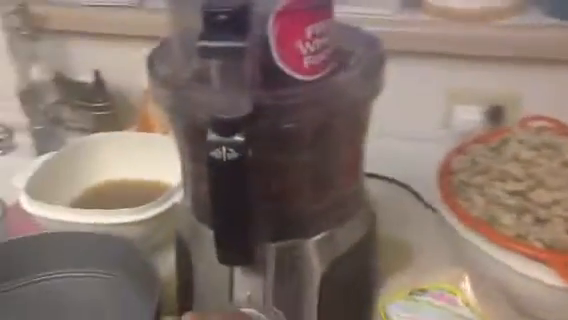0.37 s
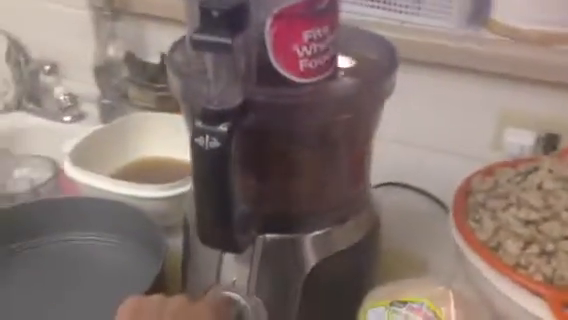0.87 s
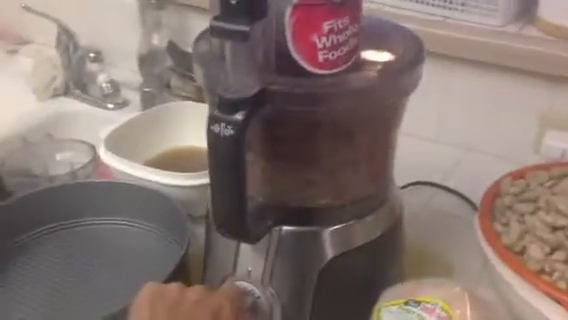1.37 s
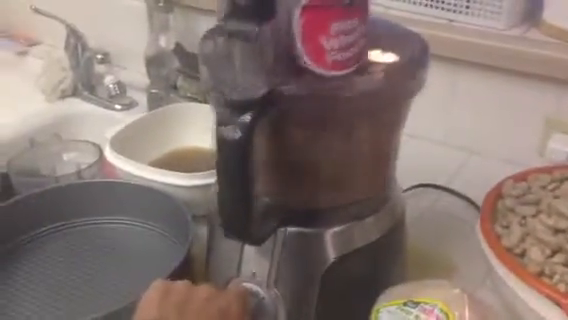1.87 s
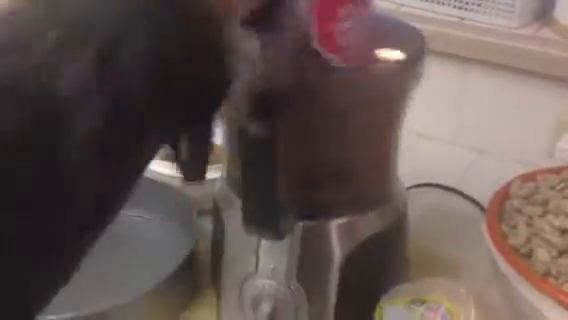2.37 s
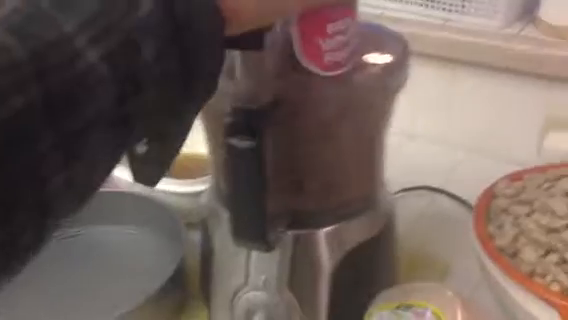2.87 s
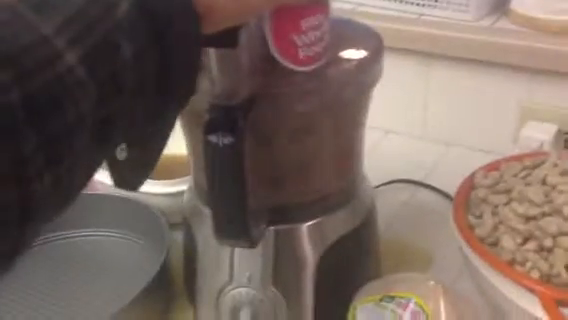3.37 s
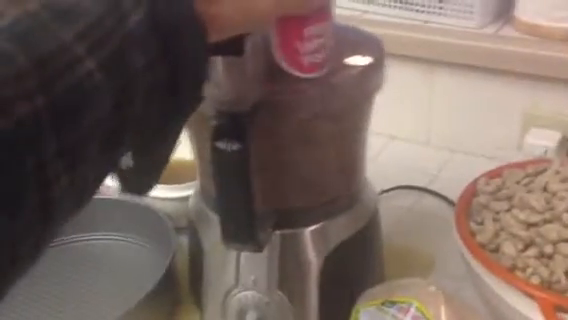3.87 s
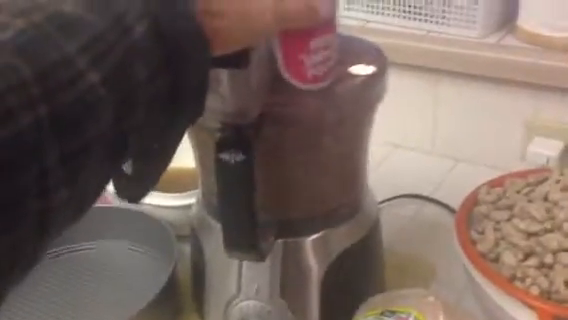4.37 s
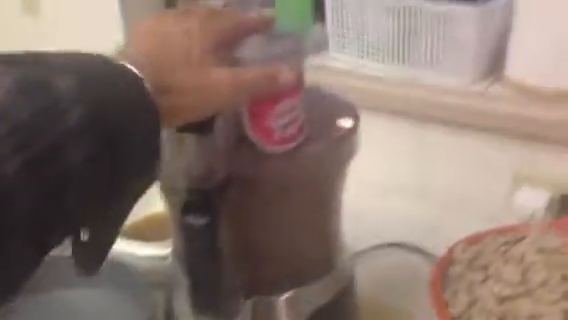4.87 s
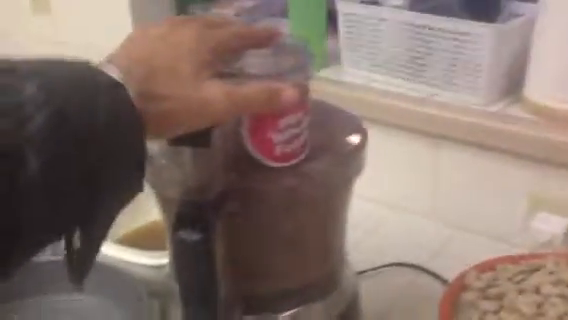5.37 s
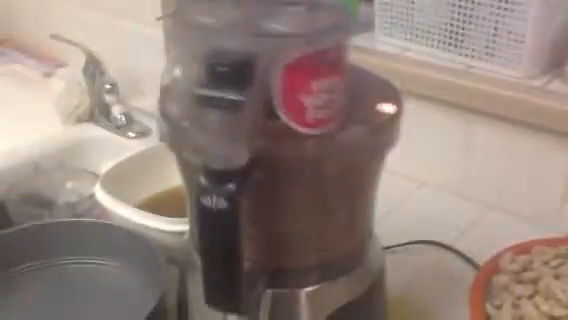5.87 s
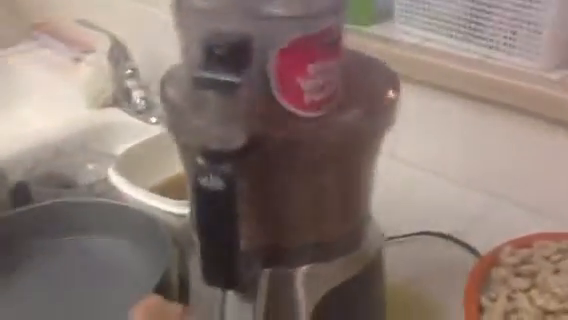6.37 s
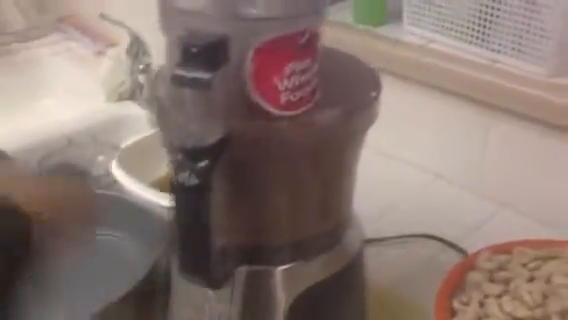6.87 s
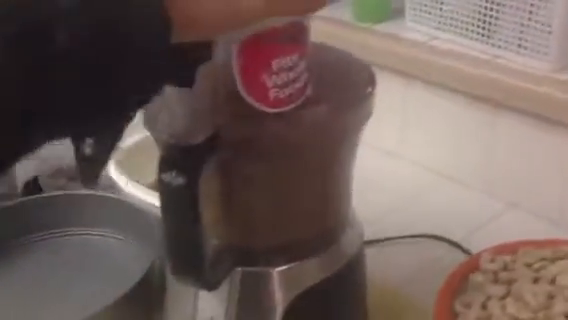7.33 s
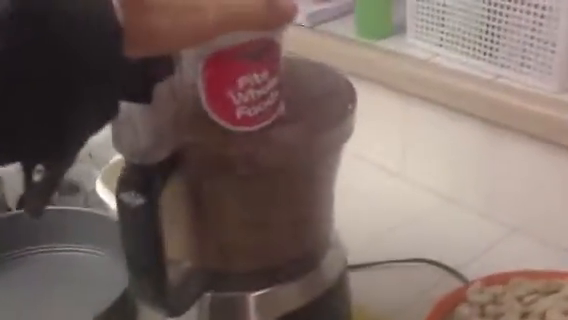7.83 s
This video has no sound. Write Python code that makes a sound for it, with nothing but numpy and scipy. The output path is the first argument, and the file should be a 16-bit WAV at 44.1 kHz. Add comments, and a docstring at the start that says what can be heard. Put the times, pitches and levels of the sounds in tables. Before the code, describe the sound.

A food processor clicks on close by, its gear whine racing up, bogging down under hard nuts with sharp knocks, then rising brighter at the end.

```python
"""Food processor grinding nuts

A food processor on a kitchen counter is switched on and grinds nuts, close to a phone.
Gear teeth whine through the ringing housing and sag under load; filtered noise makes the churning food,
the booming bowl and the fizz, and short noise bursts make hard pieces knock on the wall.
Touches on the knob come before the start; a faint hum and room tone lie under everything."""
import sys
import numpy as np
from scipy import signal
from scipy.fft import rfft, irfft, next_fast_len
from scipy.io import wavfile

SR = 44100
rng = np.random.default_rng(int(sys.argv[2]) if len(sys.argv) > 2 else 0)


def digitize_waveform(pressure):
    """Quantize a signal to 16-bit integers and store it at the path in sys.argv[1].

    Rows of a 2-D input are taken as channels; values are limited to [-1, 1].
    """
    field = np.atleast_2d(pressure).T
    bounded = np.clip(field, -1, 1)
    quanta = np.round(bounded * 32767).astype(np.int16)
    wavfile.write(sys.argv[1], SR, quanta)


def volts(x):
    """Linear amplitude factor 10**(x/20) for a level x in dB, scalar or array-like."""
    e = np.asarray(x, float) / 20
    return 10 ** e


N = 351477  # length in samples
T = np.arange(N) / SR  # time in seconds
START_S = .675  # the machine comes on

# Multiples of the tooth rate heard in the whine; the fractions are shaft sidebands: multiple
TOOTH_MULTIPLES = [.85, 1, 1.15, 1.85, 2, 3, 4, 5]
# How strong and how blurred each of those multiples is: level_db, smear_hz
TOOTH_SMEAR = [(-6, 142), (0, 96), (-9.5, 89), (-13.5, 125), (0, 129), (-6, 148), (-7.5, 88), (-8.5, 170)]
# Broad colour of the whine: pitch_hz, level_db
SHELL_COLOUR = [(700, -3.5), (1000, 2), (1300, 0.5), (1600, -2), (2100, 1.5), (2450, -1), (2900, -0.5),
                (3400, -3), (3900, 1.5), (4400, -1), (5000, -7.5), (6500, -25)]
STEADY = .3  # share of pure tone in each multiple
FLICKER_DB, FLICKER_HZ = 1.8, 9.  # each multiple swells and fades by itself


def whine():
    """Tooth impacts; no two are alike, so each multiple is a wandering cluster round a weak steady core."""
    rate = control(column=1)
    shell_hz, shell_db = np.transpose(SHELL_COLOUR)
    phase = 2 * np.pi * np.cumsum(rate * (1 + 0.01598 * wander(35.12))) / SR
    teeth = np.zeros(N)
    for k, (db, smear_hz) in zip(TOOTH_MULTIPLES, TOOTH_SMEAR):
        colour_db = np.interp(np.log(k * rate), np.log(shell_hz), shell_db)
        level = volts(db + colour_db + FLICKER_DB * wander(FLICKER_HZ))
        core = (STEADY + wander(smear_hz)) * np.cos(k * phase)
        blur = wander(smear_hz) * np.sin(k * phase)
        teeth += level * (core + blur)
    loaded = teeth * blade(1.0, 0.11, 1.97, 27.0)
    return volts(control(column=2)) * housing(loaded, direct=0.67)


# The motor spins up, sags as the blade bites, and speeds up again:
# time_s, tooth_rate_hz (before small chance wobbles), whine_db (gain), food_noise_db
MOTOR_COURSE = [(0.68, 600, -41, -32), (0.76, 793.9, -31, -23.5), (0.84, 1101, -26, -24.5),
                (0.91, 1220, -27.5, -23.5), (0.99, 1328, -24.5, -22.5), (1.229, 1450, -24, -21.5),
                (1.45, 1479, -25.5, -22), (1.6, 1364, -25.5, -21), (1.86, 1251, -26.5, -24.5),
                (1.93, 1085, -24, -22), (2.03, 990, -27, -23.5), (2.19, 935, -29, -24.5),
                (2.56, 997, -31, -24.5), (2.75, 905.7, -31, -26.5), (2.99, 1094, -32.5, -27.5),
                (3.15, 1111, -28.5, -26.5), (3.321, 1052, -31, -28.5), (3.471, 1097, -30.5, -27),
                (3.7, 990, -29, -27.5), (3.83, 895, -29.5, -28), (4.1, 1066, -31, -29),
                (4.36, 969, -30.5, -27.5), (4.502, 891, -34, -28.5), (4.75, 1000, -29, -27.5),
                (4.97, 963.5, -33, -29.5), (5.13, 1048, -30.5, -29), (5.24, 997, -30.5, -29.5),
                (5.73, 1062, -30, -26), (6.1, 908, -33.5, -25), (6.4, 991.5, -33.5, -26),
                (6.71, 1131, -27.5, -28), (6.8, 1376, -29, -25), (6.93, 1560, -27, -23.5),
                (7.17, 1593, -27, -23), (7.33, 1550, -27.5, -24.5), (7.58, 1712, -25.5, -24),
                (7.97, 1658, -26, -23)]


def control(column):
    """One column of the motor table, drawn as straight lines between its moments."""
    rows = np.array(MOTOR_COURSE)
    return np.interp(T, rows[:, 0], rows[:, column])


def blade(sweep_db, ripple_db, lump_db, lump_hz):
    """Load on the blade: once a turn, with the mains ripple, and by lumps of food."""
    turns_per_s = control(column=1) / 80 * (1 + 0.037 * wander(5.5))
    turns = np.cumsum(turns_per_s) / SR
    sweep = sweep_db * np.cos(2 * np.pi * turns)
    ripple = ripple_db * np.cos(2 * np.pi * 60 * T)
    return evened(volts(sweep + ripple + lump_db * wander(lump_hz)))


# Narrow resonances of housing and bowl: pitch_hz, width_hz, level_db (over the broad colour)
HOUSING_RINGS = [(784, 45, 0.5), (994, 105, -7), (1168, 8.2, 3), (1425, 71, 0), (1637, 17, 2.5),
                 (1954, 34, 2.5), (2187, 49, -4.5), (2804, 29, 1.5), (2960, 137, 1), (3220, 81, -7.5),
                 (3710, 227, 0.5), (4790, 62, 2.5)]


def housing(x, direct):
    """A share of direct sound plus each resonance of the shell."""
    return direct * x + sum(volts(db) * ring(x, hz, width) for hz, width, db in HOUSING_RINGS)


# Colour of the food noise before it passes the shell: pitch_hz, level_db (noise per Hz)
CHURN_COLOUR = [(210, -71), (350, -8), (627, -9.5), (996, -4), (1290, -3.5), (1780, -3.5), (1990, -3),
                (2550, -4), (3910, -12), (6000, -21.5), (7800, -48), (13200, -120)]


def churn():
    """Crumbs dragged round the bowl, heard through the shell."""
    crumbs = coloured(grit(400, 3.3, 0.0052), CHURN_COLOUR)
    through_shell = housing(crumbs, direct=1.0)
    return volts(control(column=3)) * evened(through_shell * blade(0.59, 0.37, 1.0, 15.0))


def grit(per_s, spread_db, decay_s):
    """Noise made of short bursts of uneven size over a steady bed."""
    starts = rng.random(N) < per_s / SR
    sizes = volts(spread_db * np.minimum(rng.exponential(1, N), 5)) * starts
    bursts = signal.lfilter([1], [1, -np.exp(-1 / (decay_s * SR))], sizes)
    return rng.standard_normal(N) * (1.9 + bursts / bursts.mean())


# Colour of the boom: pitch_hz, level_db (noise per Hz)
BOOM_COLOUR = [(65, -69), (110, -37), (161, -13.5), (197, -2.5), (254, 0), (328, -3), (409, -11),
               (475, -17), (520, -9.5), (680, -20.5), (1140, -120)]
BOOM_DB, BOOM_DB_PER_OCTAVE, BOOM_FOLLOWS = -33.5, 1, 1.48  # FOLLOWS: dB per dB of food noise


def boom():
    """The bowl and counter shake at their lowest resonances."""
    level_db = law(BOOM_DB, BOOM_DB_PER_OCTAVE, BOOM_FOLLOWS) + 2 * wander(3.8)
    shaking = coloured(rng.standard_normal(N), BOOM_COLOUR) * blade(0.3, 0.32, 1.14, 25.0)
    return volts(level_db) * evened(shaking)


LOADED_HZ, USUAL_FOOD_DB = 1000, -27  # tooth rate and food noise at which the law adds nothing


def law(db, db_per_octave, follows):
    """Level in dB that rises with speed and with the noise of the food."""
    from_speed = db_per_octave * np.log2(control(column=1) / LOADED_HZ)
    from_food = follows * (control(column=3) - USUAL_FOOD_DB)
    return db + from_speed + from_food


# Colour of the fizz before the speed changes its top: pitch_hz, level_db (noise per Hz)
FIZZ_COLOUR = [(2350, -26), (4000, -4.5), (5450, -14.5), (6590, -15), (7210, -18.5), (13300, -32),
               (15300, -37)]
FIZZ_DB, FIZZ_DB_PER_OCTAVE, FIZZ_FOLLOWS = -37, 8, 0.84  # FOLLOWS: dB per dB of food noise


def fizz():
    """Fine particles spraying on plastic, and cooling air; brighter as the motor runs faster."""
    spray = coloured(grit(400, 1.1, 0.006), FIZZ_COLOUR)
    air = signal.sosfilt(signal.butter(2, 10000., "high", fs=SR, output="sos"), spray)
    spray = spray + 0.26 * (control(column=1) / 1200 - 1) * air
    level = volts(law(FIZZ_DB, FIZZ_DB_PER_OCTAVE, FIZZ_FOLLOWS))
    return level * evened(spray * blade(0.16, 0.38, 0.99, 5.2))


# The hardest pieces hitting the bowl: time_s, crack_db, thud_db (relative to the crack);
# both levels are nominal, with fixed trims and colours added below
HARD_KNOCKS = [(0.678, -45, 10), (1.5423, -23, -1), (1.612, -35, 12), (1.6906, -36, 3), (1.7947, -28, -2),
               (2.0002, -31, 5), (2.1686, -31, 0), (2.3208, -30, 3.5), (2.5284, -31, -13), (2.829, -34, -9),
               (3.4937, -40, -6), (3.6351, -38, 4), (4.0617, -42, 8.5), (4.2833, -34, -2), (4.363, -34, -2),
               (4.4193, -32.5, 0), (4.4441, -33, -4), (4.6312, -34, -10), (4.8812, -31.5, 1),
               (5.4138, -34, 0), (5.9643, -37, -6), (6.2841, -33, -6), (6.4881, -38, 6), (6.5495, -45, 11),
               (7.2551, -24, -15)]
SMALL_COUNT, SMALL_DB, SMALL_SPREAD_DB = 30, -36, 9  # smaller pieces: number, loudest, range below
TICK_DB, TICK_T60_S = 4, .008  # first contact of a knock: nominal level over its crack, decay by 60 dB


def knocks():
    """A sharp tick, a bright crack, and a duller thud through the shell."""
    cracks, thuds, ticks = np.zeros((3, N + 3000))
    t = np.arange(3000) / SR
    small = [(START_S + a * (T[-1] - START_S), SMALL_DB - SMALL_SPREAD_DB * b, 2 - 8 * c)
             for a, b, c in rng.random((SMALL_COUNT, 3))]  # at chance moments
    pieces = small + HARD_KNOCKS
    noises = rng.standard_normal((len(pieces), 2, 3000))
    for (s, db, thud_db), (bright, dull) in zip(pieces, noises):
        at = round(s * SR)
        cracks[at:at + 3000] += volts(db - 3.5 - 60 * t / 0.071) * bright
        ticks[at:at + 3000] += volts(db + TICK_DB - 60 * t / TICK_T60_S) * bright
        soft_start = np.minimum(t / 0.0023, 1)
        thuds[at:at + 3000] += volts(db + thud_db + 7.5 - 60 * t / 0.051) * dull * soft_start
    # colours: (pitch_hz, level_db)
    crack = coloured(cracks[:N], [(1000, -3), (4000, 20), (9000, -6.0), (16000, -15)])
    thud = coloured(thuds[:N], [(100, -43), (280, 20.5), (1200, 7), (4000, -6.0), (8000, -27)])
    tick = coloured(ticks[:N], [(3000, -30), (6000, -4), (10000, -8), (16000, -12)])
    return crack + tick + housing(thud, direct=1.0)


# Spells in which a thin metal part rings: start_s, end_s, first_pitch_hz, last_pitch_hz, level_db
SINGING_SPELLS = [(0.968, 1.567, 6400, 6600, -43), (2.399, 3.399, 6580, 6507, -56),
                  (2.951, 4.28, 9454, 9400, -63), (5.06, 5.861, 9510, 9450, -59),
                  (6.358, 6.8, 9210, 9660, -58)]
SING_FADE_S, SING_WIDTH_HZ = .06, 45  # fade at each end of a spell; limit of the chance wander


def singing():
    """A metal part rings faintly in a narrow band."""
    out = np.zeros(N)
    for start, end, first_hz, last_hz, db in SINGING_SPELLS:
        phase = 2 * np.pi * np.cumsum(np.interp(T, [start, end], [first_hz, last_hz])) / SR
        spell = np.clip(np.minimum(T - start, end - T) / SING_FADE_S + .5, 0, 1) ** 2
        band = wander(SING_WIDTH_HZ) * np.cos(phase) + wander(SING_WIDTH_HZ) * np.sin(phase)
        out += volts(db) * spell * band
    return out


# Colour of the low shudder: pitch_hz, level_db (noise per Hz)
RUMBLE_COLOUR = [(12, -59), (20, -34), (86, -22), (116, -10), (140, 2), (180, -22), (310, -120)]
# How strong the shudder is: time_s, level_db
SHUDDER_LEVEL = [(.7, -55), (1.3, -55), (1.7, -50), (3.5, -50), (4.6, -50.5), (5.6, -51.5), (6.4, -52.5),
                 (7.2, -48), (7.97, -52)]


def rumble():
    """The counter carries a low shudder, made of deep noise."""
    s, db = np.transpose(SHUDDER_LEVEL)
    return volts(np.interp(T, s, db)) * evened(coloured(rng.standard_normal(N), RUMBLE_COLOUR))


# Fingers on the knob, then its click: time_s, level_db (before a fixed trim), rub_t60_s (decay by 60 dB)
KNOB_TOUCHES = [(0.079, -44, 0.18), (0.387, -38.5, 0.21), (0.452, -46, 0.15), (0.674, -21.5, 0.24)]
# Resonances of the knob: pitch_hz, level_db, t60_s (ringing time)
KNOB_RINGS = [(410, 7.5, 0.0092), (840, 0, 0.015), (1370, -9, .012), (2200, -21, 0.025), (2860, -16, 0.016),
              (4180, -24, 0.0059)]


def touches():
    """Soft plastic taps that rub on for a moment."""
    out, t = np.zeros(N), np.arange(6000) / SR
    for s, db, rub_s in KNOB_TOUCHES:
        noise = rng.standard_normal(6000)
        rub = (noise + 18 * (t == 0)) * volts(-60 * t / rub_s)  # a sharp contact, then friction
        tap = sum(volts(d) * ring(rub, hz, 2.4 / t60) for hz, d, t60 in KNOB_RINGS)
        out[round(s * SR):][:6000] += volts(db - 7.0) * tap
    return out


def room(x, t60, wet_db):
    """Tiled walls: a short dense tail of fading noise."""
    t = np.arange(SR // 2) / SR
    tail = rng.standard_normal(len(t)) * volts(-60 * t / t60) * (t > .004)
    return x + volts(wet_db) * signal.oaconvolve(x, tail / np.linalg.norm(tail))[:N]


# Colour of the room tone: pitch_hz, level_db (noise per Hz)
KITCHEN_COLOUR = [(15, -71), (25, -46), (112, -21), (155, -15), (226, -3), (273, -10), (466, -12.5),
                  (777, -20), (912, -18), (1070, -24), (1400, -22.5), (2270, -27), (15300, -36.5)]
# An appliance somewhere: pitch_hz, level_db (before a small lift and chance wavering)
HUM_TONES = [(118.4, -70), (231.5, -62.5), (463, -76), (904, -76), (1370, -79)]


def kitchen():
    """Room tone from coloured noise, with a wavering hum of pure tones."""
    hum = sum(volts(db + 1 + 1.5 * wander(17.0)) * np.sin(2 * np.pi * hz * T) for hz, db in HUM_TONES)
    return volts(-59) * evened(coloured(rng.standard_normal(N), KITCHEN_COLOUR)) + hum


def evened(x):
    """Scales to an rms (average strength) of 1."""
    return x / np.sqrt(np.mean(x ** 2) + 1e-20)


def coloured(x, points):
    """Filters x by a spectrum given as points on a log axis."""
    f, db = np.transpose(points)
    size = next_fast_len(len(x))
    hz = np.arange(size // 2 + 1) * SR / size
    gain = volts(np.interp(np.log(hz + 1), np.log(f + 1), db))
    return irfft(rfft(x, size) * gain, size)[:len(x)]


def wander(hz):
    """Slow chance movement, rms 1, up to hz."""
    low_pass = signal.butter(2, hz, fs=SR, output="sos")
    return evened(signal.sosfilt(low_pass, rng.standard_normal(N)))


def ring(x, hz, width):
    """Fixed two-pole resonance with a gain of 1 at its peak."""
    return signal.lfilter(*signal.iirpeak(hz, hz / width, fs=SR), x)


def scene():
    """Machine, knocks and touches in the room, over the room tone."""
    machine = whine() + churn() + boom() + rumble() + fizz() + singing()
    machine *= np.clip((T - START_S) / 0.0044, 0, 1)  # silent until switched on
    return (machine + room(knocks() + touches(), t60=0.049, wet_db=-3) + kitchen())[None]


def top_cut(x):
    """Nothing passes above the cut-off."""
    return signal.sosfilt(signal.butter(12, 15440, fs=SR, output="sos"), x)


def record(dry):
    """The phone cuts deep bass and the top."""
    thin = signal.sosfilt(signal.butter(2, 60., "high", fs=SR, output="sos"), dry)
    edge = signal.firwin(2001, 15420, window=("kaiser", 9), fs=SR)  # steep low-pass
    mix = signal.oaconvolve(thin, edge[None], "same")
    return top_cut(mix)


dry = scene()
out = record(dry)
digitize_waveform(out)
```